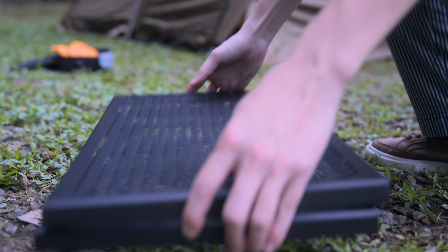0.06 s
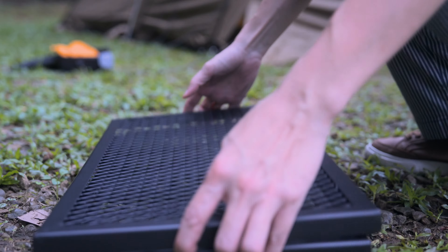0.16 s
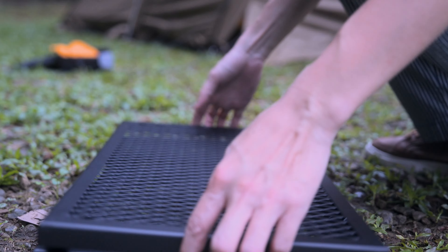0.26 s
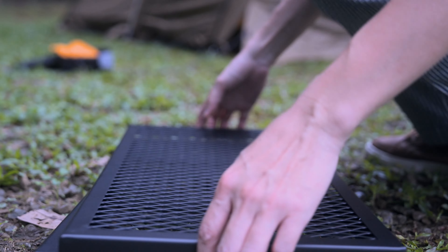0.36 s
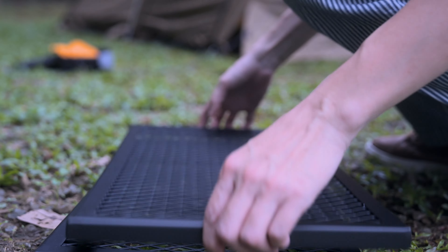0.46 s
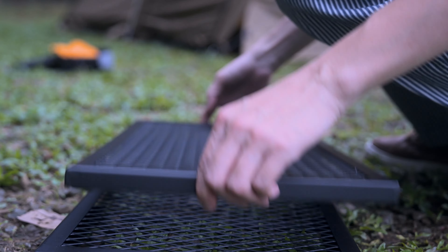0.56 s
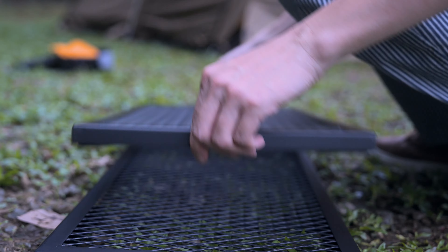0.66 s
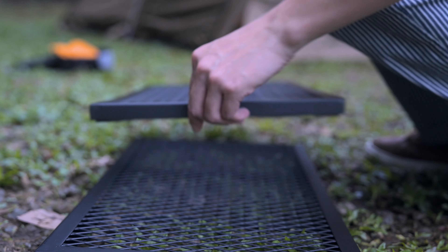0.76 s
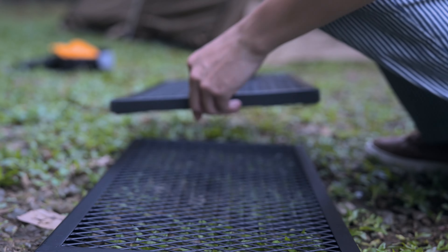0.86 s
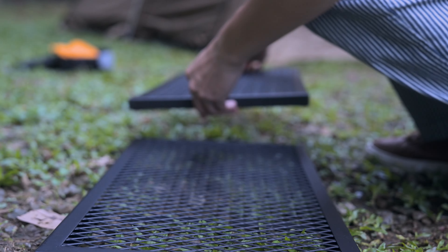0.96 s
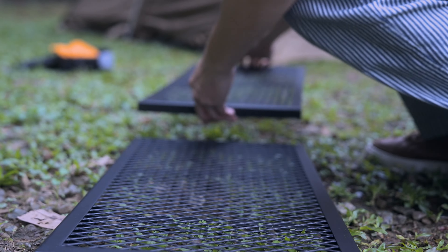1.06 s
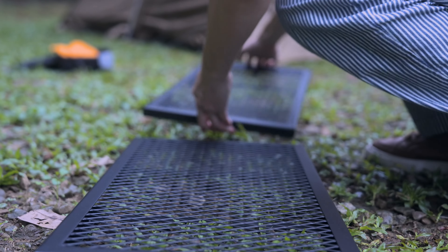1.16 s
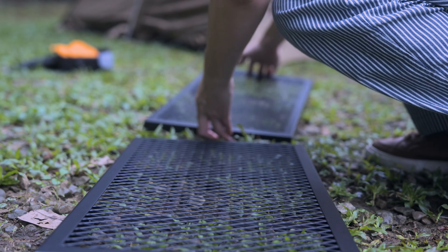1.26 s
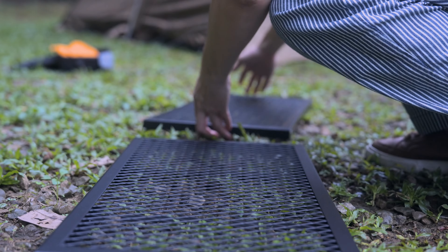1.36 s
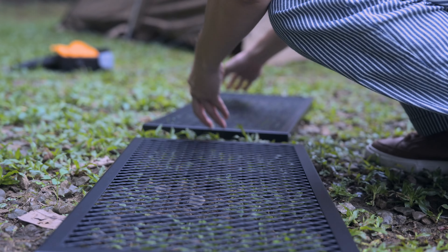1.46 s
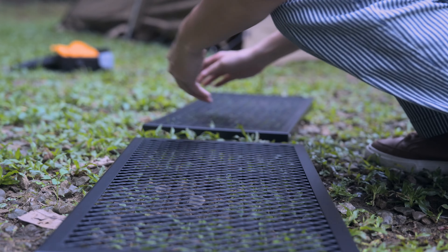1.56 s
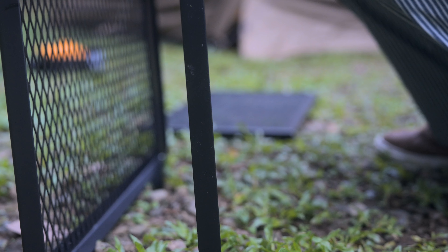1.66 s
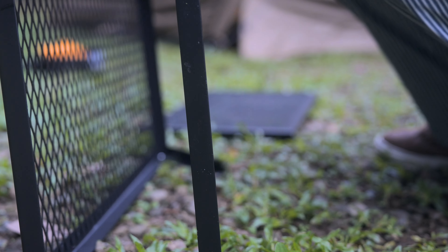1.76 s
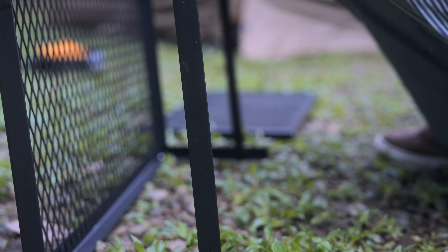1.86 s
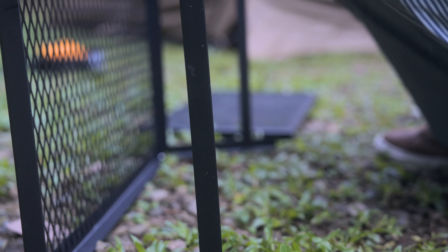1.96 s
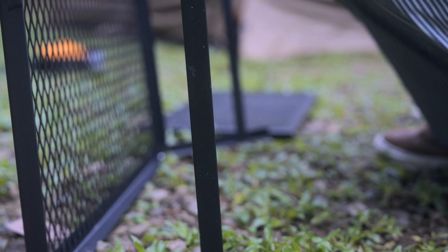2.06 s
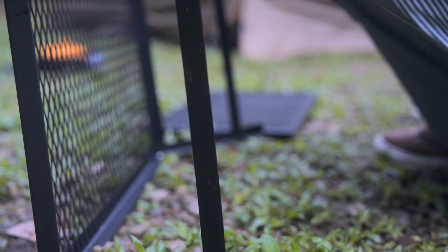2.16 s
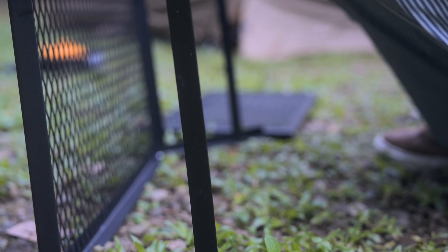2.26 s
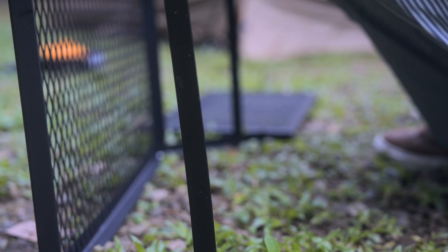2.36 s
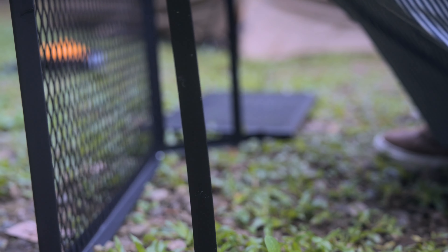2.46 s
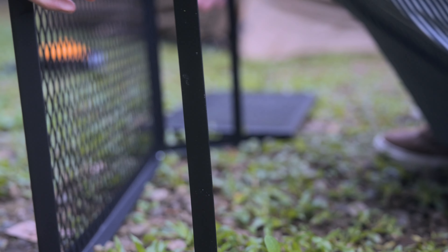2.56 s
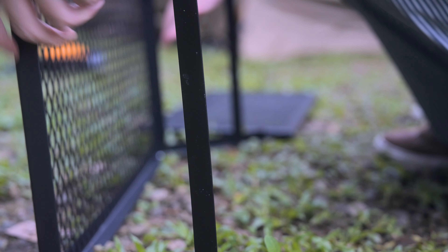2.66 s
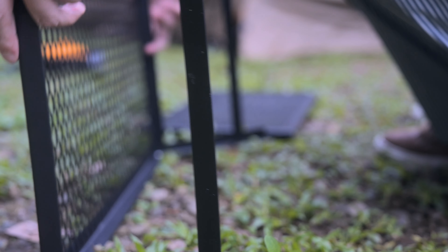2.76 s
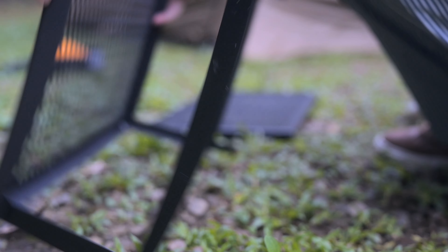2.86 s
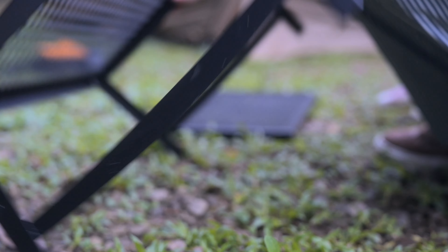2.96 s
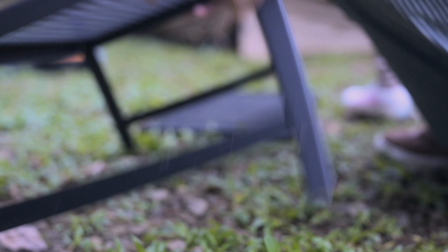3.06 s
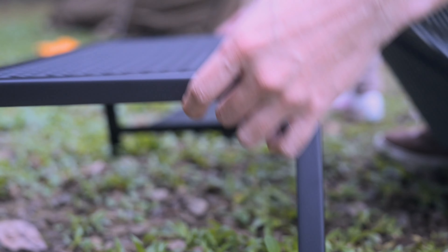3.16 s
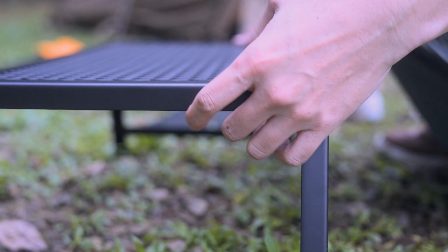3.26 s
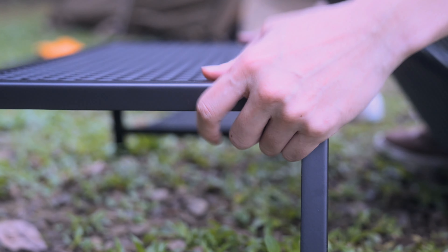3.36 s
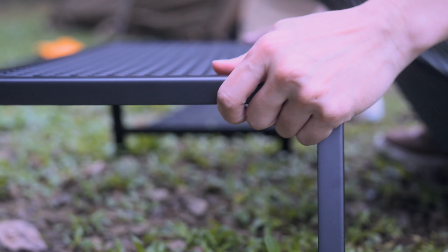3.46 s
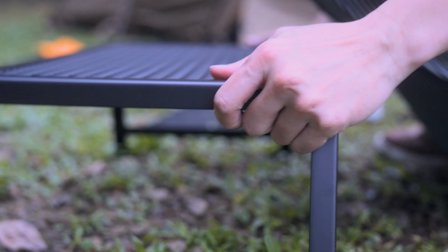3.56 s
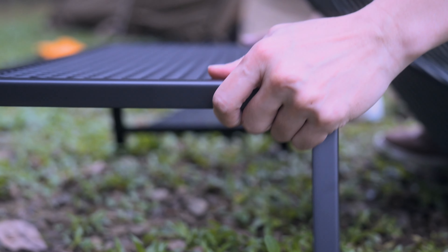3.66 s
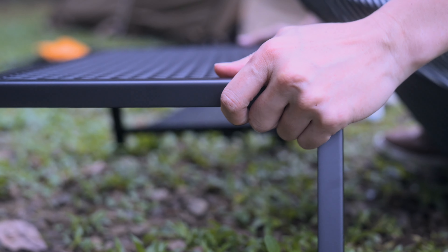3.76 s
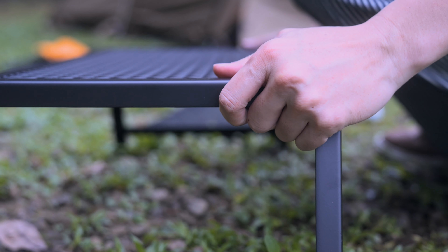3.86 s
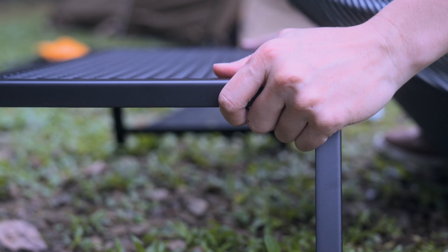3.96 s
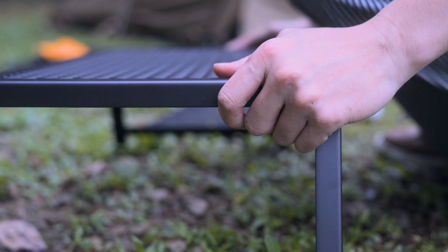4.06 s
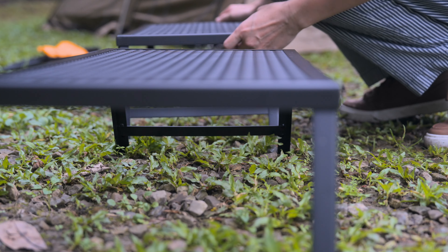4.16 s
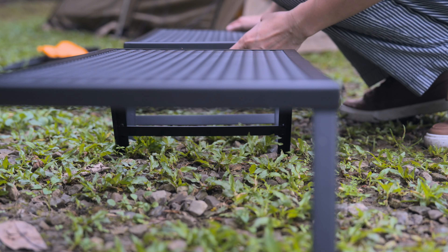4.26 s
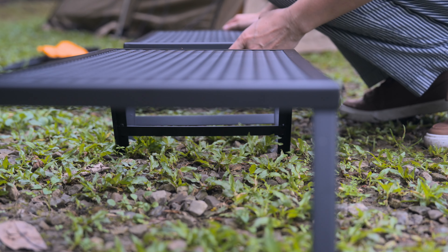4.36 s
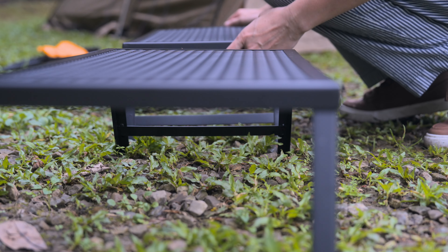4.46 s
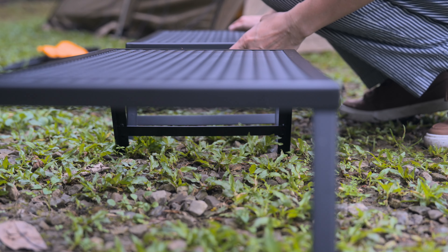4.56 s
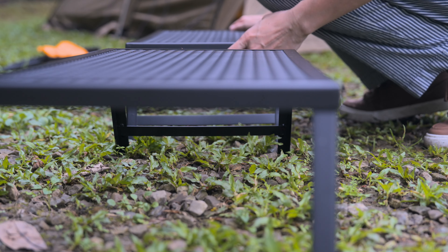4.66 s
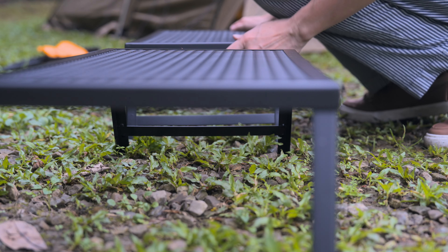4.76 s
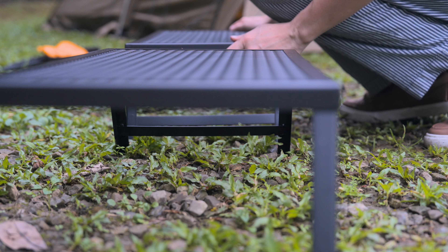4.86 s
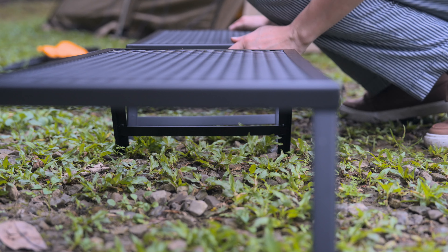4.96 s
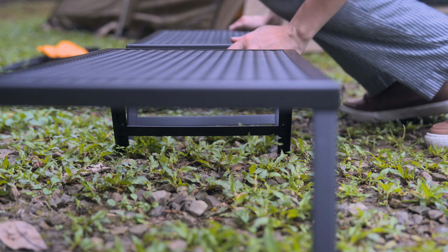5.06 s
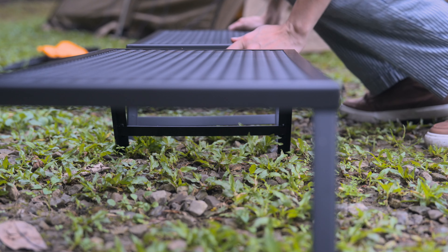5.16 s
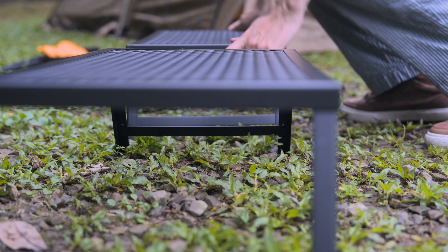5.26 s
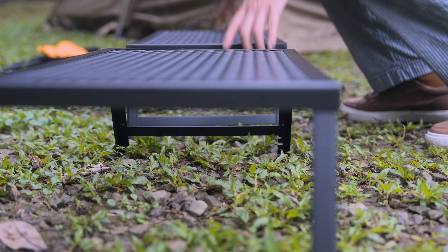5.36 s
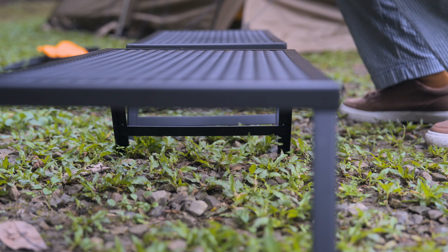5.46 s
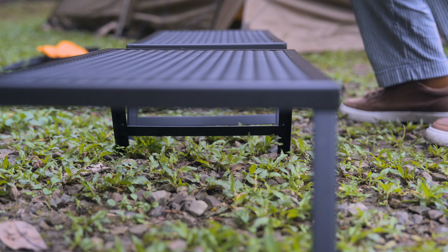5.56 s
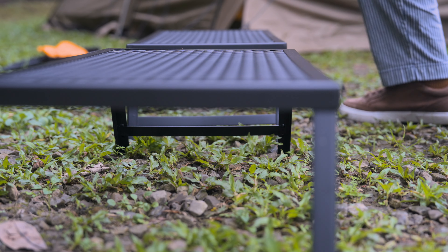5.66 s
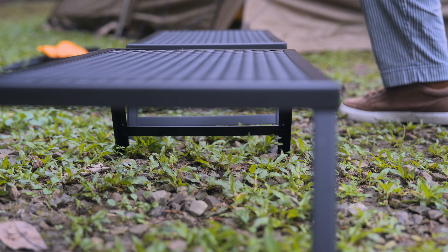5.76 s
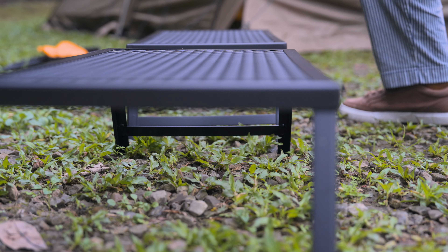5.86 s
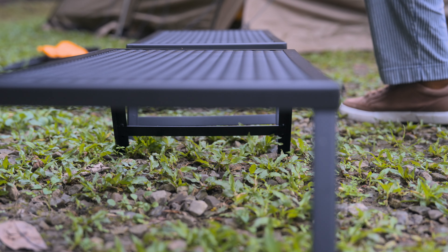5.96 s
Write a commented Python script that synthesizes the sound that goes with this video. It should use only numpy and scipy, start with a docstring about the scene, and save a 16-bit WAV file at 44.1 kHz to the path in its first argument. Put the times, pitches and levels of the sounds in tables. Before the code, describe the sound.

Close, dry outdoor sound with soft low rumble, hiss and faint insect-like buzz throughout. From 0.2 to 0.4 seconds a steel-mesh panel falls in a rapid cluster of loud, bright clangs, loose mesh and legs chattering as the ring decays. Around 0.9 to 1.2, tiny soft finger taps over a faint steady hum. At 1.26 to 1.65 the second panel drops, slightly left, with knocks, a strong clang at 1.4 and rattling; the metal ring stops abruptly at 1.7. Sparse quiet clinks follow, firmer near 2.15. At 2.9 a leg snaps home with a clear ring, then sliding and a faint hinge squeak near 3.0. A hard double clack at 3.2 sets the frame down; small damped knocks and gritty scraping run from 3.45 to 3.85. Dull thumping clacks come at 4.3, fainter at 4.55. Then soft cloth and grass brushes at 5.0, 5.4 and 5.9, with a dull shoe step on the right near 5.97.

```python
"""Steel-mesh camp tables set up on grass, close by: noise and modes shaped by timed tables.
Two panels drop, their loose mesh and legs chattering; fingers tap between the falls, over an early faint hum.
The metal stops abruptly at 1.7 s. Legs are pulled out; one snaps home with clear modes and its hinge squeaks.
The frame is set down, rocked and pressed into place amid gritty sliding; then cloth and grass brush, a shoe steps.
Soft rumble, hiss and two bands of faint buzz run throughout."""
import sys
import numpy as np
from scipy import signal
from scipy.fft import rfft, irfft, next_fast_len
from scipy.io import wavfile

SR = 44100
rng = np.random.default_rng(int(sys.argv[2]) if len(sys.argv) > 2 else 0)


def to_wav(sig):
    """Store sig (one row per channel, or 1-D mono) as 16-bit WAV at the path in sys.argv[1].

    Samples outside -1..1 are clipped; the rate is SR.
    """
    pcm = np.clip(np.atleast_2d(sig), -1, 1) * 32767
    pcm = np.round(pcm).astype(np.int16)
    wavfile.write(sys.argv[1], SR, pcm.T)  # frames by channels


N = 265085
TIME = np.arange(N) / SR
RING = TIME[:3 * SR // 4]  # time axis of one ring [s]

# Levels are relative: each source applies its own gain or pan.
# blows on the frame: (time [s], level [dB], thud re level [dB], treble re level [dB],
# basic ring t60 [s], contact tick re ring [dB])
BLOWS = [ (0.178, -30.5, -40, -10.5, .25, -28), (0.1991, -30.5, -24.5, -13, 0.49, -20),
         (0.2157, -22, -42, -5, .3, 2), (0.2650, -19, -49, -5, 0.32, -17),
         (0.2765, -16.5, -65, -2.5, .2, -18), (0.3159, -16.5, -58, -5, 0.35, -15),
         (0.3603, -17, -31, -6, 0.41, -1.5), (1.2637, -27.5, -33.5, -2.5, 0.26, -19.5),
         (1.3625, -35.5, -16, -2.5, .4, -2), (1.384, -25.5, -23.5, 8, 0.22, 4.5),
         (1.3933, -16.5, -51, -3, 0.51, -18), (1.507, -23, -30.5, -29, 0.24, 4),
         (1.621, -39, -14.5, -47, 0.17, 10.5), (1.6541, -39.5, -17.5, -18.5, 0.12, 1),
         (1.8095, -38.5, -55, -0.5, 0.21, -16), (1.836, -48, -48, -2, 0.2, -6),
         (1.891, -48.5, -39, 0.5, 0.38, -13.5), (2.114, -44.5, -35, -20, 0.69, -17),
         (2.1364, -34, -37, -14.5, 0.36, -4), (2.1534, -32.5, -35, -17.5, 0.14, 10),
         (2.2345, -46.5, -17.5, -7.5, 0.35, -3), (2.529, -54.5, -31, -5.5, 0.24, -5.5),
         (2.8148, -48, -31, -25, 0.47, -5), (2.8756, -36, -49, -14, 0.17, -13),
         (2.894, -28.5, -68, -8.5, 0.26, 10.5), (3.2139, -22.5, -55, -16.5, 0.17, -19),
         (3.2436, -19, -25.5, -14, 0.13, 6), (3.451, -45.5, -23, -12, 0.51, -5),
         (3.5486, -37.5, -28, -10, 0.42, -19), (3.5916, -38, -18.5, -31, 0.086, 12),
         (3.619, -38.5, -29, -6, 0.16, -10), (3.627, -32, -35, -15, .14, -1),
         (3.697, -40.5, -30, -12, 0.15, 3), (3.7144, -33.5, -18.5, -10.5, 0.096, 6),
         (3.7379, -33.5, -35, -24, 0.23, -18), (3.7511, -40, -45, -13, 0.23, 16),
         (3.7709, -30, -25, -16, 0.21, -5), (3.8118, -34, -15, -8, 0.23, -20),
         (3.8316, -29, -21, -23, 0.12, -1), (3.8412, -34, -14.5, -11, 0.084, 1),
         (4.2778, -37, -17.5, -14.5, 0.15, -20), (4.2945, -32.5, -31, -15.5, 0.24, 5),
         (4.312, -36, -5.5, -8.5, 0.12, 8.5), (4.3463, -47.5, -2, -9, 0.54, 5),
         (4.5248, -45, -15.5, -13.5, 0.19, 11), (4.5339, -45.5, -8.5, -24, 0.18, 2),
         (4.572, -45.5, -3, -9.5, 0.22, 18)]
# loose mesh and folded legs after a fall: (time [s], level [dB], bouncing [s], decay [dB/s], treble re level [dB])
CHATTER = [(0.19, -36, 0.084, 398.5, -9), (0.268, -27, .17, 235, 1.5), (1.39, -29.5, .08, 111, 1.5)]
# leg snapping home: (time [s], level [dB])
LATCH = [(2.814, -73.5), (2.893, -30)]
# hinge rubbing: (peak time [s], level [dB], rise [s], fall [s])
HINGE = [(3.01, -53.5, 0.05, 0.076), (3.07, -54, .06, 0.028)]
# sleeves and feet while the table is turned over:
# (peak time [s], level [dB], rise [s], fall [s], treble re level [dB])
SLIDES = [(1.78, -68.5, 0.053, 0.076, 6), (2.85, -63.5, .13, 0.24, 8.5), (2.961, -54.5, .15, .3, -4.5),
          (3.11, -58.5, 0.028, 0.089, 2.5), (3.18, -58, .06, 0.044, 4.5), (3.3, -49, 0.056, 0.2, -15),
          (3.61, -56, .15, 0.11, -13), (3.759, -55, 0.13, 0.21, -3), (3.845, -40.5, .05, 0.025, -2)]
# trousers and grass on standing up: (peak time [s], level [dB], rise [s], fall [s], treble re level [dB])
BRUSHES = [(4.81, -68.5, 0.24, .08, 2), (4.976, -58, 0.043, 0.14, -4), (5.368, -58, 0.091, 0.1, -5),
           (5.689, -73.5, .04, .2, -3), (5.873, -58, .03, 0.13, 5.5), (5.98, -57, 0.057, 0.18, -1.5)]
# fingers shifting on the carried panel: (time [s], level [dB], centre [Hz])
FINGERS = [(0.901, -72, 2460), (0.963, -71.5, 2300), (0.985, -68.5, 1065), (1.036, -68.5, 1030),
           (1.055, -72, 1034), (1.138, -64, 1690), (1.165, -72, 1760), (1.185, -73, 1090),
           (1.216, -63.5, 2500)]
# shoe on the soil: (time [s], level [dB], t60 [s], upper band edge [Hz])
STEPS = [(4.459, -62.5, 0.065, 1253), (4.51, -61, 0.018, 1360), (5.935, -56.5, 0.0033, 3730),
         (5.971, -40.5, 0.0031, 2320), (5.988, -54.5, 0.14, 720), (6.002, -51.5, 0.17, 700)]
# distant buzz, perhaps insects: (centre [Hz], width [Hz], level [dB])
BUZZ_BANDS = [(1580, 260, -77.5), (5580, 770, -81)]
# modes of a mesh panel, before damping: (frequency [Hz], level [dB], t60 [s])
PANEL_MODES = [(271, -11.5, 0.67), (333, -12, 0.77), (390, -11.5, 0.52), (420, -16, 0.36),
               (459.8, -21.5, 0.65), (620, -13.5, 0.41), (736, -5.5, .35), (975, -16.5, .6),
               (1070, -8.5, 1), (1190, -11.5, 0.94), (1440, -10, 0.46), (1554, -4, 0.54), (1636, -1, 0.3),
               (1860, -3, 0.1), (2116, -4, 0.18), (2287, -5.5, 0.3), (2440, -4, 0.26), (2656, -0.5, 0.083),
               (2883, -4, 0.57), (3050, -2.5, 0.8), (3210, 2, 0.13), (3480, 0.5, 0.14), (3730, -3.5, 0.14),
               (5180, -4, 0.16)]
# modes of the free leg: (frequency [Hz], level [dB], t60 [s])
LEG_MODES = [(910, -25, 0.82), (935, -24.5, 0.6), (1790, -16.5, 0.98), (1770, -13, .3), (1790, -19, 0.41),
             (2270, -13.5, 1), (2470, -17.5, 0.55), (2976, 0, .22), (2950, 4, 0.25), (3350, -9, 0.37),
             (3710, 0, 0.26), (3770, -9, 0.41), (4630, -6, 0.19), (4650, -13, 0.37), (6180, 5, 0.08),
             (7200, -4, 0.056), (8600, -10, 0.14)]
# spectrum of struck wires: (frequency [Hz], level [dB])
STEEL_SPECTRUM = [(60, -25), (120, -12), (200, -18.5), (480, -20.5), (750, -12), (1150, -16), (1600, -4),
                  (2400, -1.5), (3200, 0.5), (4500, -1), (6200, -5.5), (7200, -7.5), (10000, -7.5),
                  (13500, -17), (16000, -17)]
# spectrum of chattering mesh: (frequency [Hz], level [dB])
MESH_SPECTRUM = [(47, -61), (80, -28), (217, -26), (369, -18), (451, -20.5), (718, -11), (785, -12),
                 (1250, -11), (1630, -5), (2380, -5), (3100, -6), (4730, -6.5), (10700, -16), (13400, -10),
                 (16000, -17)]
# spectrum of rustling: (frequency [Hz], level [dB])
CLOTH_SPECTRUM = [(150, -2.5), (600, -9), (1050, -5), (1500, 3.5), (3200, 1.5), (5000, -4.5), (8500, -6.5),
                  (16000, -4)]
# spectrum of the outdoor air: (frequency [Hz], level [dB])
AIR_SPECTRUM = [(15, -34.5), (25, -4), (120, -1), (373, -18.5), (463, -18), (560, -21.5), (936, -21.5),
                (1610, -21), (2480, -24.5), (2690, -18), (3620, -24), (5730, -22.5), (6380, -28),
                (10100, -26.5), (16000, -30.5)]
# stereo width: (frequency [Hz], side re mid [dB])
WIDTH = [(100, -25), (350, -22), (700, -18), (1400, -11), (2800, -5), (5600, -3), (10000, 0), (15000, -1.5)]
# position of the handled part: (time [s], left minus right [dB])
LEFT = [(.2, -1), (.37, -1.5), (1.26, -5), (1.5, -0.5), (2.14, 0), (3.24, -1.5), (3.8, -1.5), (4.3, -5.5)]
# edges of the registers thud, body, clang, edge, treble: (frequency [Hz])
EDGES_HZ = [70, 300, 1200, 3500, 6500, 16500]

CUT_S, TOP_HZ, AIR_DB = 1.702, 16350, -67.5
BODY_DB, BODY_DB_PER_THUD_DB = -10.5, .52  # a heavier blow also drives the panel's body
EDGE_DB, EDGE_DB_PER_TREBLE_DB = -1, 0.44  # a harder blow also sharpens the edge
CHATTER_DULL_DB_PER_S, CHATTER_FADE_DB = 47, 47  # treble loss with age; fall until all is still
SWELL_DB = 19  # a stroke rises and falls through this range


def blows(modes_db=-15, hiss_db=-8, tick_t60_s=.017, tail_db=-25, tail_t60_s=0.11, thud_t60_s=0.13,
          gain_db=-6, register_db=(3, 1.5, -1.5, 0, 1), ring_length=(1.2, 1, .9, .8)):
    """Each blow is a contact tick, the mesh's shimmer and the panel's modes; hands and soil damp the ring."""
    out = np.zeros((2, N))
    hiss = unit(spread(colour(rng.standard_normal((2, N)), STEEL_SPECTRUM)))
    steel = mesh_ring() + undb(hiss_db) * hiss
    registers = np.array([unit(band(steel, lo, hi, order=4)) for lo, hi in zip(EDGES_HZ, EDGES_HZ[1:])])
    # every blow finds the wires in other phases
    starts = rng.integers(0, N - len(RING), len(BLOWS))

    thud_db, treble_db = np.array(BLOWS)[:, 2:4].T
    thud, treble = undb(thud_db), undb(treble_db)
    body = undb(BODY_DB + BODY_DB_PER_THUD_DB * thud_db)
    edge = undb(EDGE_DB + EDGE_DB_PER_TREBLE_DB * treble_db)
    # a harder contact moves energy from the clang to the edge
    clang = np.sqrt(np.maximum(1 - edge ** 2, .04))
    tones = np.transpose([thud, body, clang, edge, treble]) * undb(register_db)

    # the low modes answer only to blows with body
    is_low = np.array(PANEL_MODES)[:, 0] < EDGES_HZ[2]
    strengths = np.where(is_low, np.minimum(5 * body, 1.5)[:, None], clang[:, None])
    panels = ringing(PANEL_MODES, len(BLOWS), scatter_db=3.5, strengths=strengths)

    # from body to treble, higher wire modes die sooner
    length = np.array(ring_length)[:, None]
    tail = undb(tail_db) * fade(tail_t60_s * length)
    tick = fade(tick_t60_s)
    contact = 1 - np.exp(-RING / .0005)
    sinking = (1 - fade(.02)) * fade(thud_t60_s)  # the soil gives way slowly
    for (s, db, _, _, t60_s, tick_db), tone, panel, i in zip(BLOWS, tones, panels, starts):
        wires = registers[..., i:i + len(RING)]
        decay = fade(t60_s * length) + tail + undb(tick_db) * rebounds(tick)
        shimmer = np.einsum("bn,bcn->cn", tone[1:, None] * decay, wires[1:])
        modes = undb(modes_db) * panel * fade(3 * t60_s)
        metal = (shimmer + modes) * contact * pan(left_at(s))
        soil = tone[0] * wires[0] * sinking
        add(out, s, undb(db + gain_db) * (metal + soil) * before_cut(s))
    return out


def mesh_ring(count=2000):
    """A thicket of close wire modes, ringing steadily in stereo."""
    lines = np.zeros((2, N // 2 + 1), complex)
    hz = np.linspace(np.sqrt(EDGES_HZ[0]), np.sqrt(TOP_HZ), count) ** 2
    hz = hz * (1 + .01 * rng.standard_normal(count))
    phases = np.exp(2j * np.pi * rng.random((2, count)))
    # hz ** (1/4) offsets the wider spacing of high modes
    lines[:, (hz * N / SR).astype(int)] = hz ** (1 / 4) * rng.rayleigh(size=count) * phases
    return unit(spread(colour(irfft(lines, N), STEEL_SPECTRUM)))


def ringing(modes, count, scatter_db, strengths=1):
    """Stereo rings for count blows; each strikes the decaying modes with its own strengths."""
    hz, db, t60_s = np.transpose(modes)
    waves = np.sin(2 * np.pi * hz[:, None] * RING) * fade(t60_s[:, None])
    chance = rng.standard_normal((count, 3, len(hz)))
    mid = strengths * np.sign(chance[:, 0]) * undb(db + scatter_db * chance[:, 1])
    side = mid * np.sign(chance[:, 2]) * gains(WIDTH, hz)
    return np.stack([(mid + side) @ waves, (mid - side) @ waves], axis=1)


def rebounds(tick, within_s=0.07, size=0.1, count=4):
    """A contact tick followed by a few weaker ones as the loose joints bounce."""
    out = tick.copy()
    for when, strength in rng.random((count, 2)):
        lag = 1 + int(when * within_s * SR)
        out[lag:] += size * strength * (1 - when) * tick[:-lag]
    return out


def before_cut(s):
    """Gate that stops abruptly at CUT_S any ring begun before it; later rings pass."""
    return (s > CUT_S) | (s + RING < CUT_S)


def chatter(gain_db=-2.0, ring_db=-10, damped_t60_s=1.5, linger_db=-17, linger_t60_s=0.63, linger_hz=1250):
    """Loose parts buzz against a dropped panel and keep its modes ringing; low modes build up and linger."""
    rattle = sum(grains(*settling(*fall), rate_hz=480, scatter_db=7.5, spectrum=MESH_SPECTRUM,
                        bed=0.31, edge_db=0.0, edge_follow=0.24) for fall in CHATTER)
    panel = ringing(PANEL_MODES, count=1, scatter_db=1)[0] * fade(damped_t60_s)
    low_modes = band(rng.standard_normal(len(RING)), 260, linger_hz, order=4) * fade(linger_t60_s)
    ring = unit(signal.oaconvolve(rattle, panel, axes=1)[:, :N])
    linger = unit(signal.oaconvolve(rattle, low_modes[None], axes=1)[:, :N])
    resonance = (undb(ring_db) * ring + undb(linger_db) * linger) * np.std(rattle)
    return (undb(gain_db) * rattle + resonance) * (TIME < CUT_S)


def settling(s, db, hold_s, fall_db_per_s, treble_db):
    """Corners (times, levels, treble) of parts that bounce, then settle, growing duller throughout."""
    age_s = np.array([0, hold_s, hold_s + CHATTER_FADE_DB / fall_db_per_s])
    return s + age_s, [db, db, db - CHATTER_FADE_DB], treble_db - CHATTER_DULL_DB_PER_S * age_s


def latch():
    """The leg hangs free as it snaps home, so it rings clearly."""
    out = np.zeros((2, N))
    rings = ringing(LEG_MODES, len(LATCH), scatter_db=1)
    for (s, db), ring in zip(LATCH, rings):
        add(out, s, undb(db) * unit(ring, size=500))
    return out


def hinge(hz=1808, width_hz=45):
    """Friction in the hinge keeps one mode of the leg singing: a narrow noise band."""
    squeak = unit(band(rng.standard_normal(N), hz - width_hz / 2, hz + width_hz / 2, order=1))
    strokes = [np.interp(TIME, *swell(*rub), left=-np.inf, right=-np.inf) for rub in HINGE]
    return squeak * sum(undb(stroke_db) for stroke_db in strokes)


def rustle(sliding_db=-2, brushing_db=-3):
    """Gritty sliding over the soil, then short brushes of cloth and grass."""
    sliding = sum(grains(*swell(*stroke), treble_db, rate_hz=260, scatter_db=18.5, spectrum=CLOTH_SPECTRUM,
                         bed=0.8, edge_db=1.1) for *stroke, treble_db in SLIDES)
    brushing = sum(grains(*swell(*stroke), treble_db, rate_hz=510, scatter_db=6, spectrum=CLOTH_SPECTRUM,
                          bed=0.63, edge_db=0.8) for *stroke, treble_db in BRUSHES)
    return undb(sliding_db) * sliding + undb(brushing_db) * brushing


def grains(s, db, treble_db, rate_hz, scatter_db, spectrum, bed=.3, edge_db=-1, edge_follow=0.15):
    """Up to 1 s of dense random contacts over smooth rubbing, following level and brightness corners."""
    t = TIME[int(s[0] * SR):int(s[-1] * SR)][:SR]
    chance = rng.random((2, len(t)))
    noise = rng.standard_normal((2, len(t)))
    clicks = (chance[0] < rate_hz / SR) * undb(scatter_db * chance[1])
    power = signal.fftconvolve(clicks ** 2, fade(.005))[:len(t)]
    sound = spread(colour(noise * np.sqrt(np.abs(unit(power)) + bed), spectrum))
    edges_hz = [EDGES_HZ[0], *EDGES_HZ[3:]]
    low, edge, high = (unit(band(sound, lo, hi)) for lo, hi in zip(edges_hz, edges_hz[1:]))
    # gentler contacts lose the top first, then the edge
    bright = undb(np.interp(t, s, treble_db + np.zeros(len(s))))
    mix = low + undb(edge_db) * edge * bright ** edge_follow + high * bright
    out = np.zeros((2, N))
    add(out, s[0], undb(np.interp(t, s, db)) * mix)
    return out


def swell(peak_s, db, rise_s, fall_s):
    """Corners (times, levels) of a stroke that builds to a peak and dies away."""
    return [peak_s - rise_s, peak_s, peak_s + fall_s], [db - SWELL_DB, db, db - SWELL_DB]


def fingers(t60_s=0.057):
    """Soft, narrow-toned taps of the grip: decaying noise in a narrow band."""
    out = np.zeros((2, N))
    for s, db, hz in FINGERS:
        tap = band(rng.standard_normal(len(RING)) * fade(t60_s), 0.88 * hz, 1.1 * hz, order=1)
        add(out, s, undb(db) * unit(tap, size=600))
    return out


def steps(side_db=5):
    """Dull snaps and a scuff under a shoe on the right: band-limited decaying noise."""
    out = np.zeros((2, N))
    for s, db, t60_s, dull_hz in STEPS:
        snap = band(rng.standard_normal(len(RING)) * fade(t60_s), dull_hz / 4, dull_hz)
        add(out, s, undb(db) * unit(snap, size=200))
    return out * undb([[-side_db], [side_db]])


def hum(hz=463, db=-78, end_s=1.26):
    """A faint far tone that fades out over its last 0.1 s."""
    return undb(db) * np.sin(2 * np.pi * hz * TIME) * np.clip((end_s - TIME) * 10, 0, 1)


def outdoors(waver_db=1.0):
    """Soft low rumble and hiss, with two faint wavering noise bands of buzz."""
    out = undb(AIR_DB) * unit(spread(colour(rng.standard_normal((2, N)), AIR_SPECTRUM)))
    for hz, width_hz, db in BUZZ_BANDS:
        knots_s = np.linspace(0, TIME[-1], 24)
        waver = undb(waver_db * np.interp(TIME, knots_s, rng.standard_normal(len(knots_s))))
        noise = band(rng.standard_normal((2, N)), hz - width_hz / 2, hz + width_hz / 2, order=2)
        out += undb(db) * waver * unit(spread(noise))
    return out


def left_at(s):
    """Left-minus-right level [dB] of the part being handled at time s."""
    return np.interp(s, *np.transpose(LEFT))


def pan(left_db):
    """Channel gains for a left-minus-right level."""
    return undb(np.array([[left_db], [-left_db]]) / 2)


def spread(pair):
    """Two unrelated signals as mid and side: the bass is central, the treble wide."""
    side = colour(pair[1], WIDTH)
    return np.array([pair[0] + side, pair[0] - side])


def colour(x, points):
    """Filter by a (Hz, dB) spectrum."""
    size = next_fast_len(x.shape[-1])
    shaped = rfft(x, size) * gains(points, np.fft.rfftfreq(size, 1 / SR))
    return irfft(shaped, size)[..., :x.shape[-1]]


def gains(points, hz):
    """Gain of a (Hz, dB) spectrum at the given frequencies."""
    f, db = np.transpose(points)
    return undb(np.interp(np.log(hz + 1), np.log(f), db))


def band(x, lo_hz, hi_hz, order=3):
    """Causal band-pass."""
    edges_hz = [lo_hz, min(hi_hz, SR / 2 - 100)]
    return signal.sosfilt(signal.butter(order, edges_hz, "band", fs=SR, output="sos"), x)


def fade(t60_s):
    """Exponential decay of a ring, by 60 dB in t60_s."""
    return np.exp(-np.log(1000) * RING / np.maximum(t60_s, 1e-3))


def unit(x, size=None):
    """Scale to rms 1, taken over the first size samples."""
    return x / np.sqrt(np.mean(x[..., :size] ** 2) + 1e-20)


def undb(db):
    """Decibels to gain."""
    return 10 ** (np.asarray(db) / 20)


def add(out, s, x):
    """Mix x in at time s."""
    i = int(s * SR)
    out[:, i:i + x.shape[-1]] += x[..., :N - i]


def scene():
    """The table, the person handling it and the campsite."""
    handling = (chatter() + latch() + hinge() + rustle()) * pan(left_at(TIME))[:, 0]
    return blows() + handling + fingers() + steps() + hum() + outdoors()


def record(dry):
    """Steep elliptic low-pass at TOP_HZ removes the extreme treble."""
    return signal.sosfilt(signal.ellip(10, .2, 70, TOP_HZ, fs=SR, output="sos"), dry)


dry = scene()
out = record(dry)
to_wav(out)
```